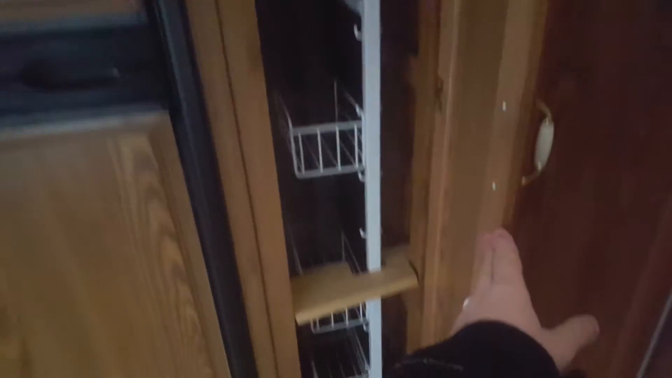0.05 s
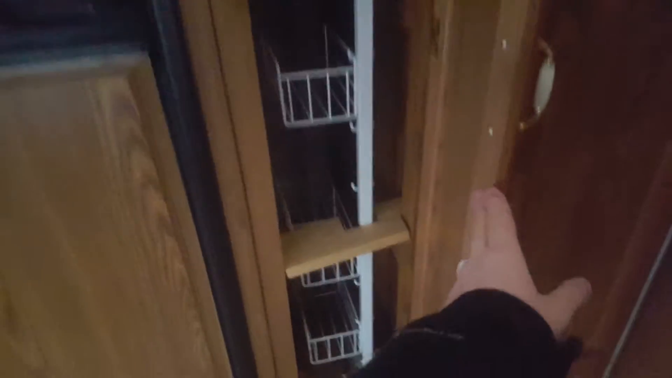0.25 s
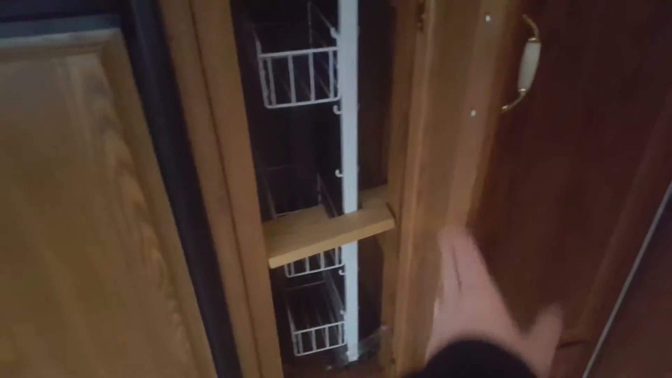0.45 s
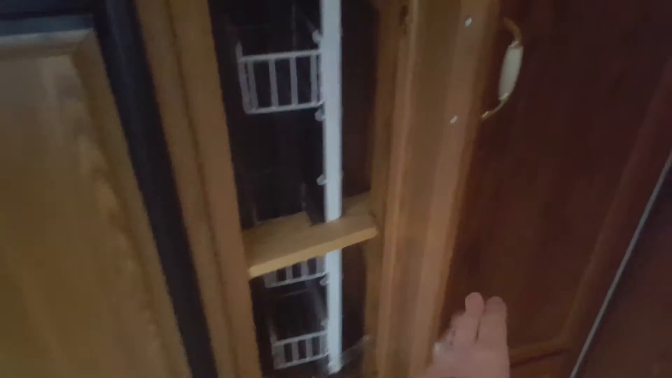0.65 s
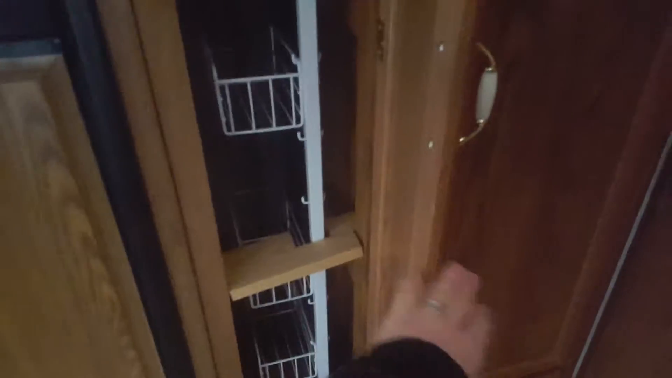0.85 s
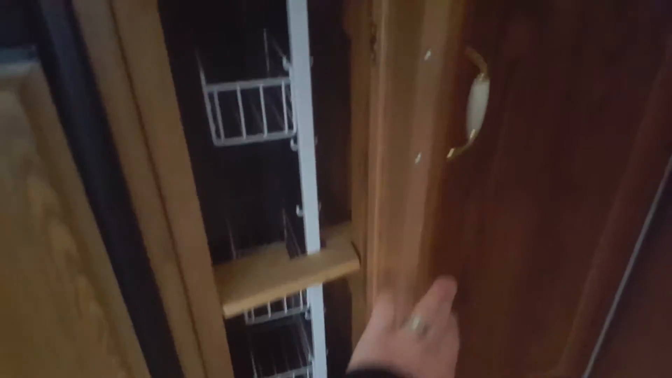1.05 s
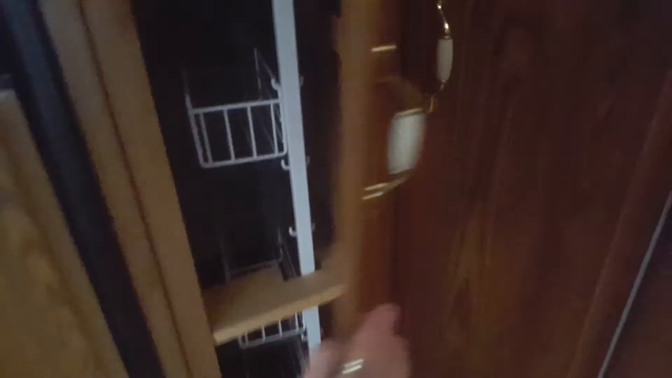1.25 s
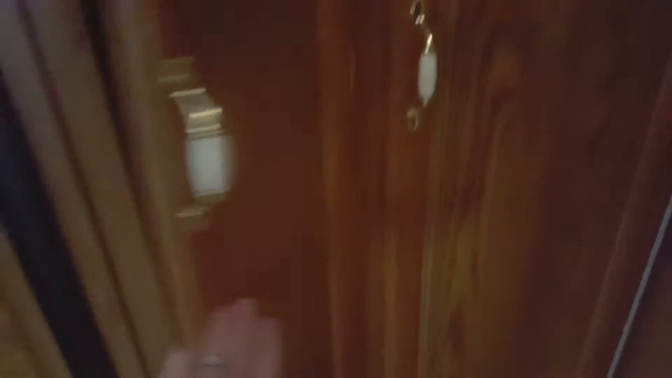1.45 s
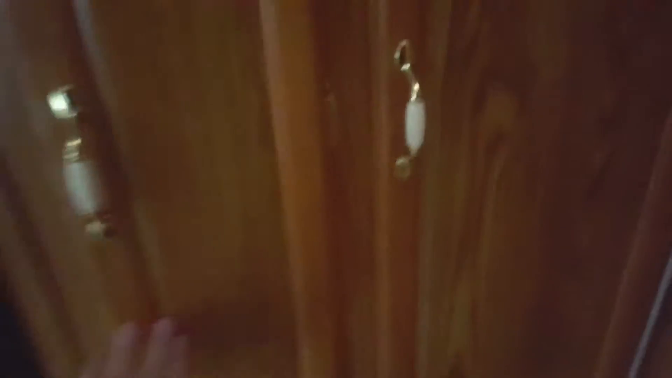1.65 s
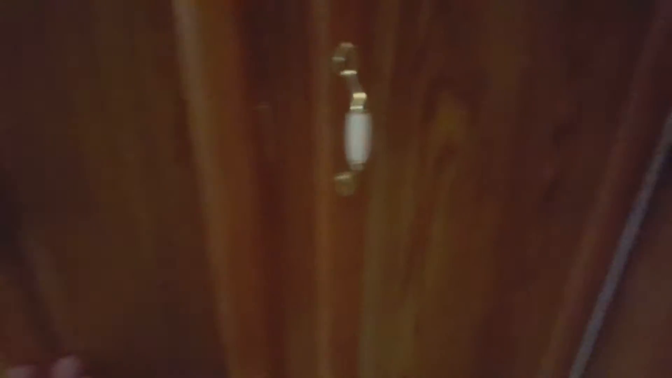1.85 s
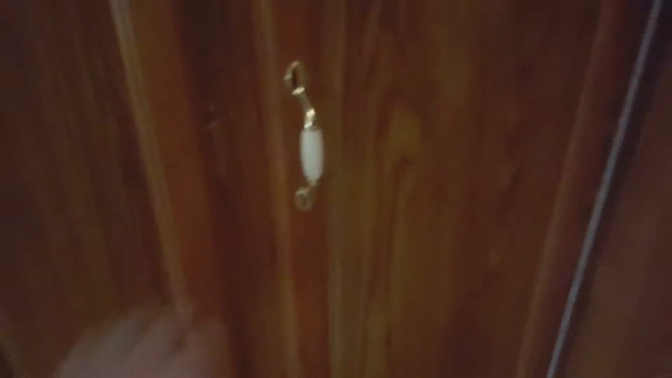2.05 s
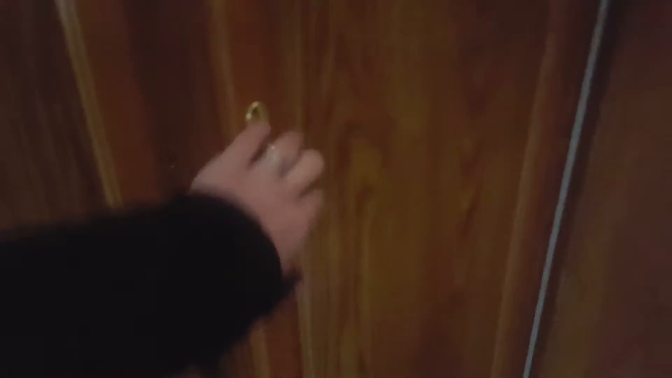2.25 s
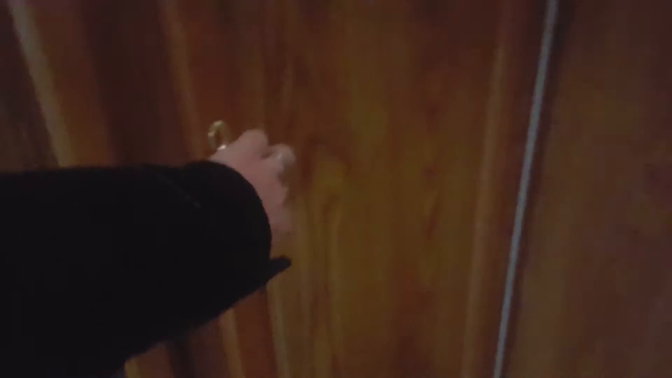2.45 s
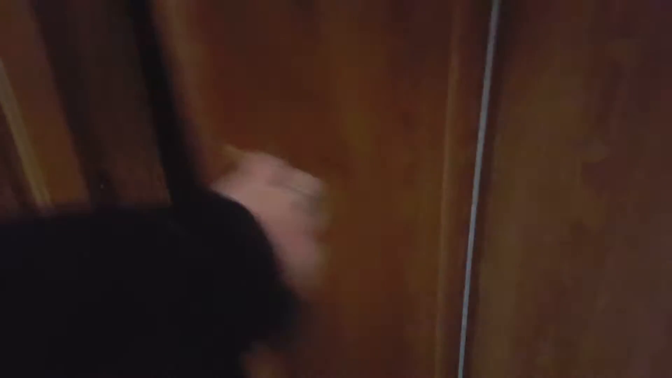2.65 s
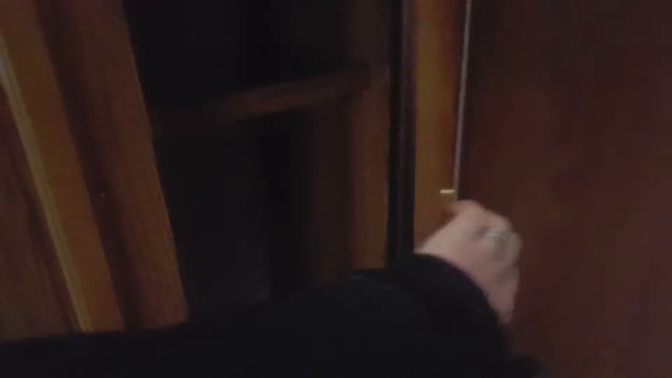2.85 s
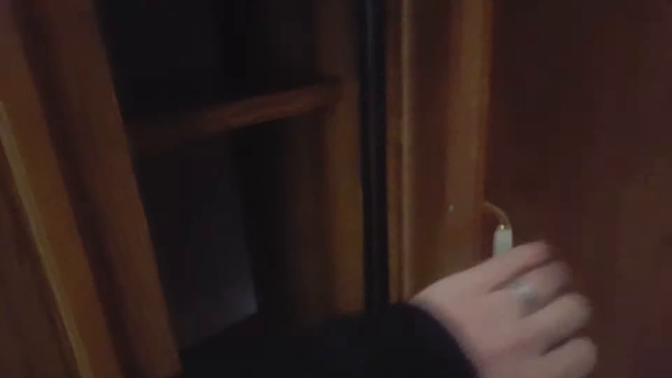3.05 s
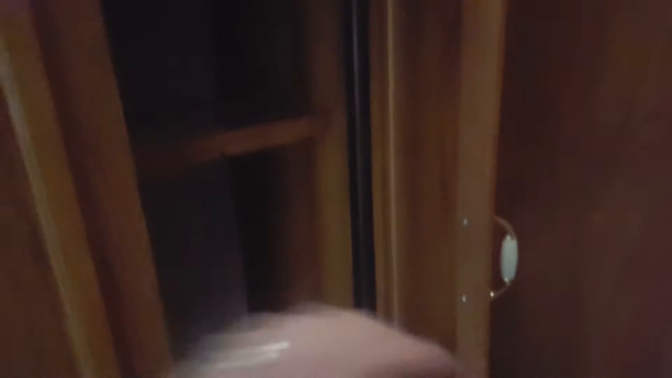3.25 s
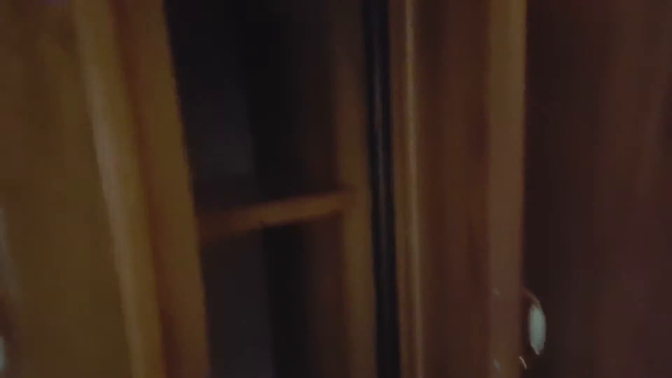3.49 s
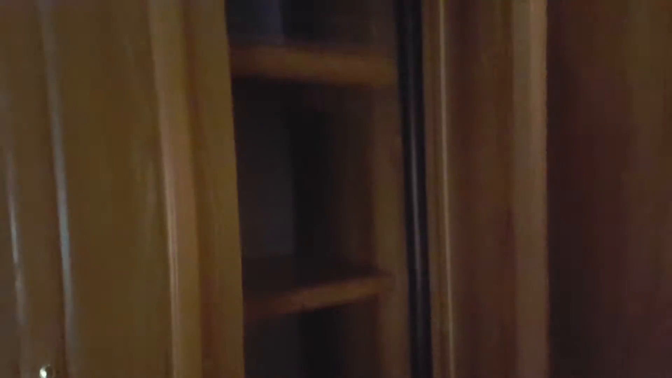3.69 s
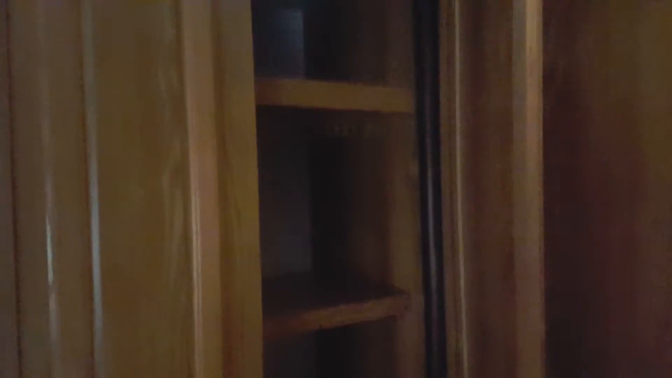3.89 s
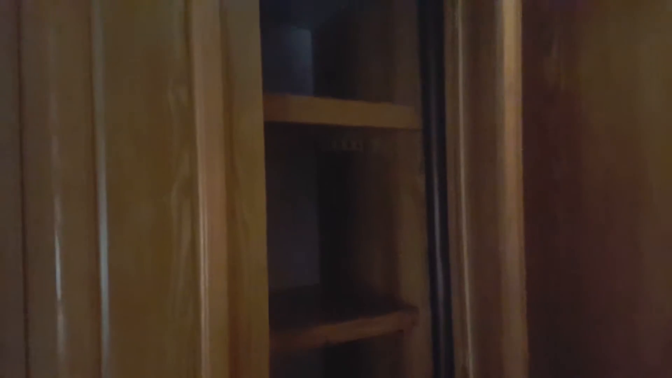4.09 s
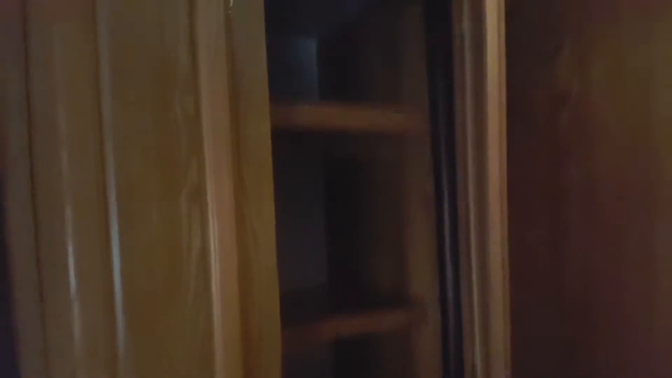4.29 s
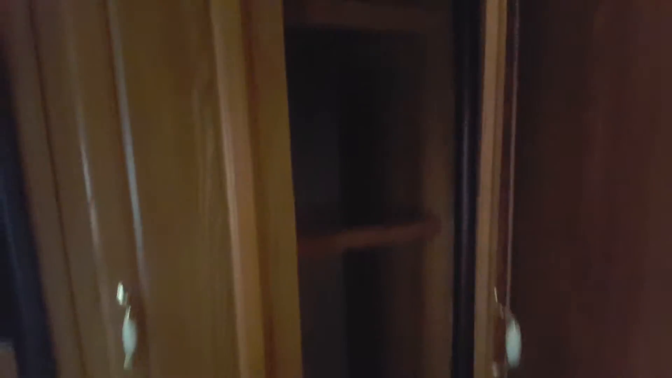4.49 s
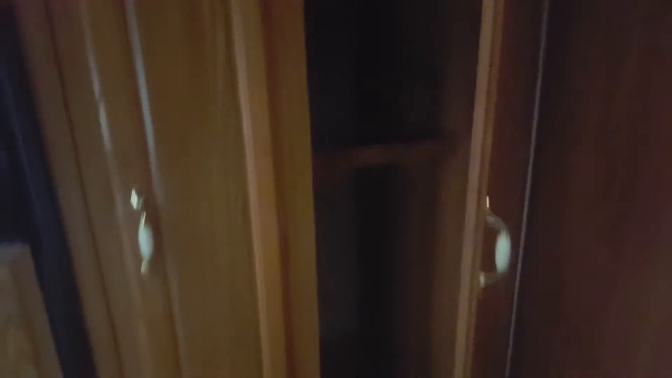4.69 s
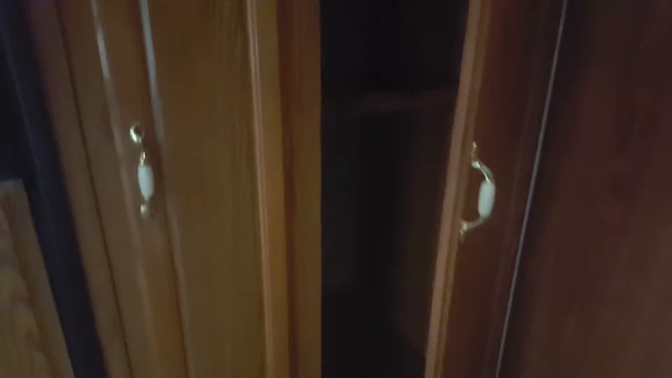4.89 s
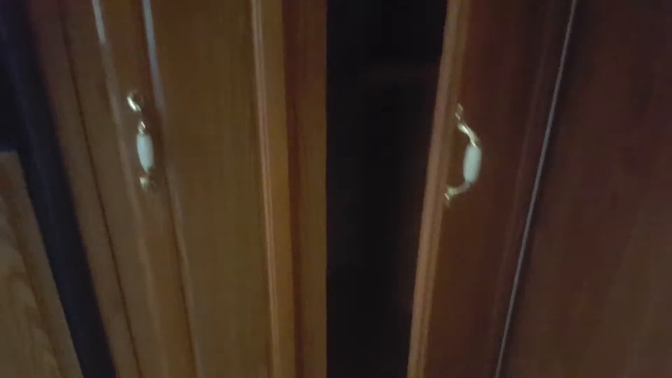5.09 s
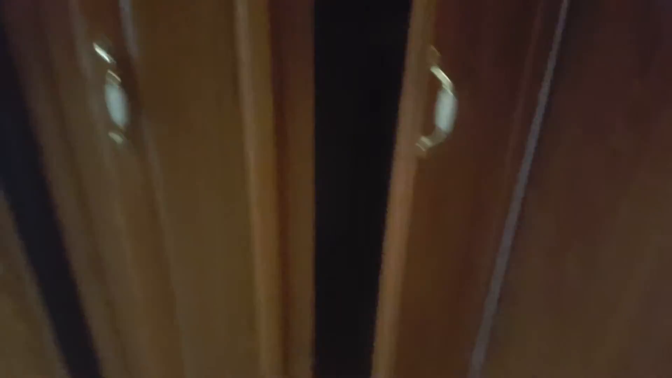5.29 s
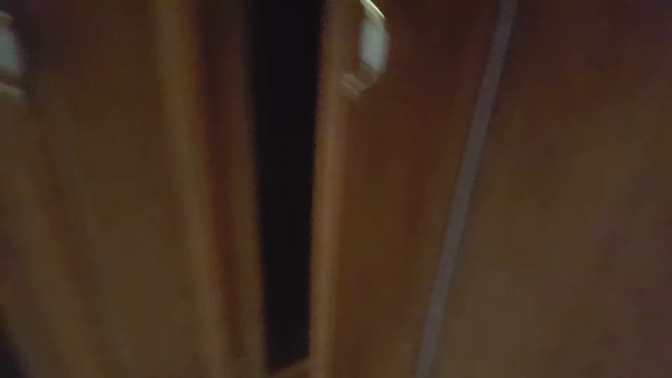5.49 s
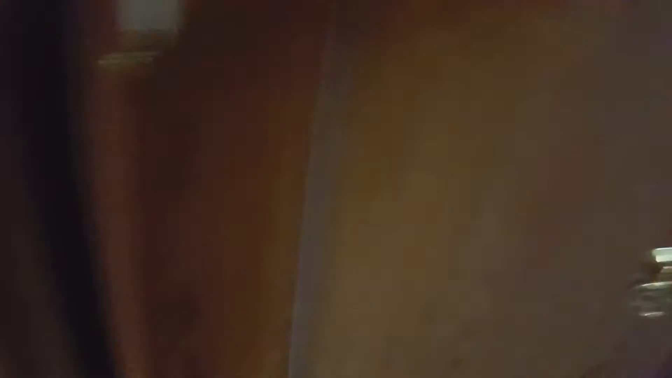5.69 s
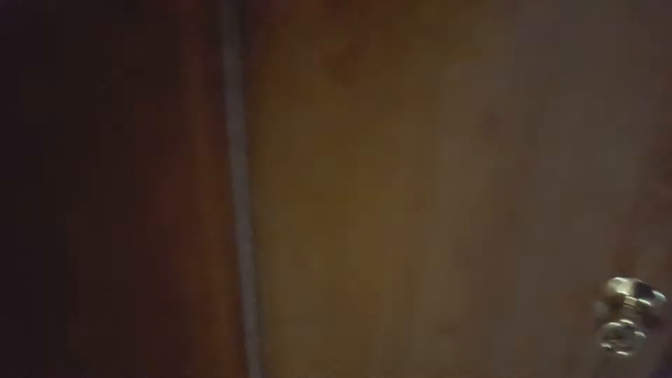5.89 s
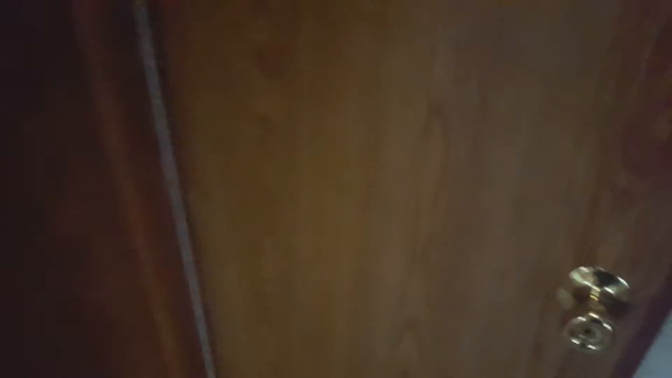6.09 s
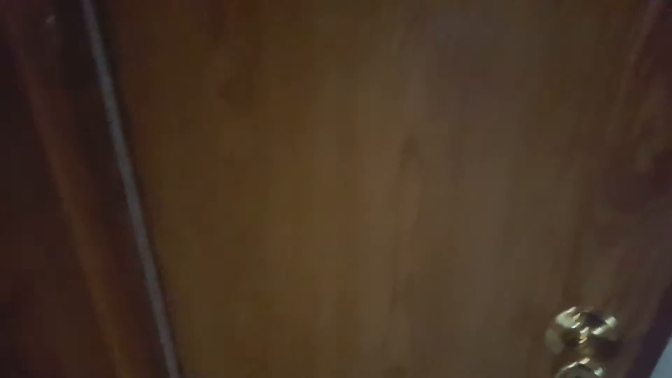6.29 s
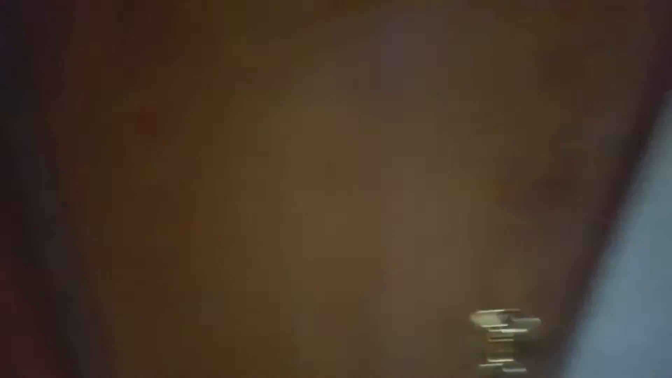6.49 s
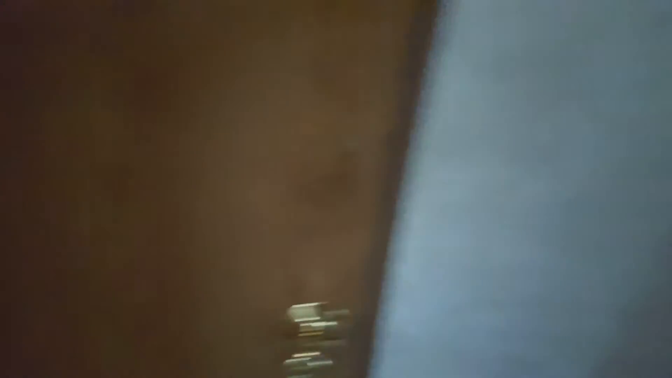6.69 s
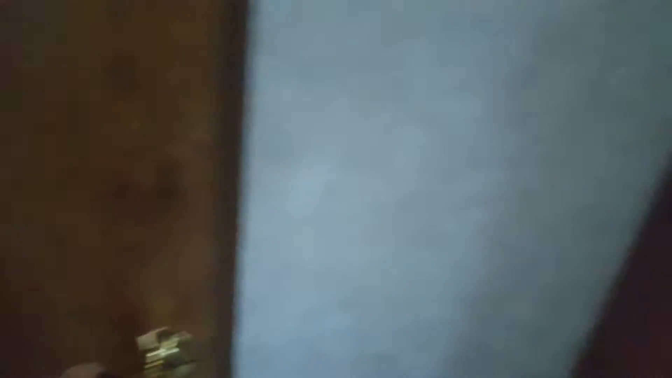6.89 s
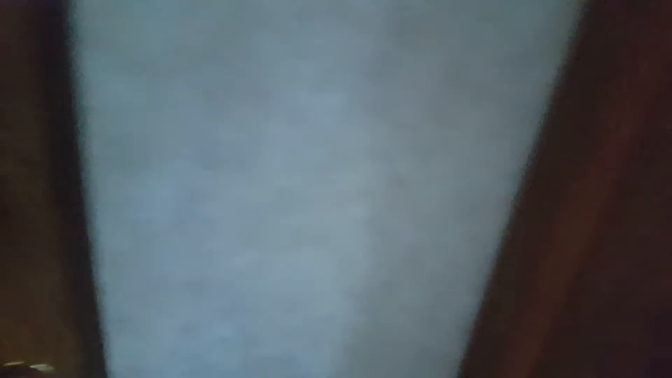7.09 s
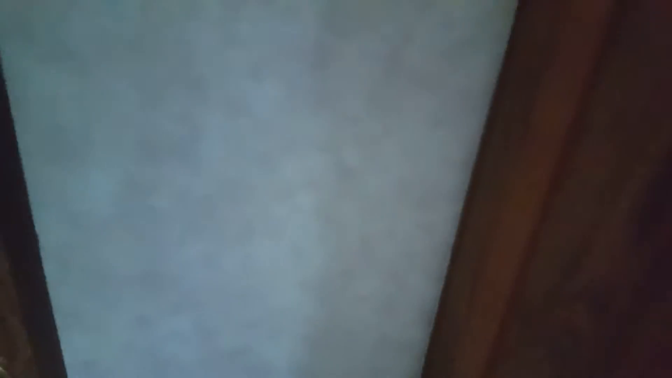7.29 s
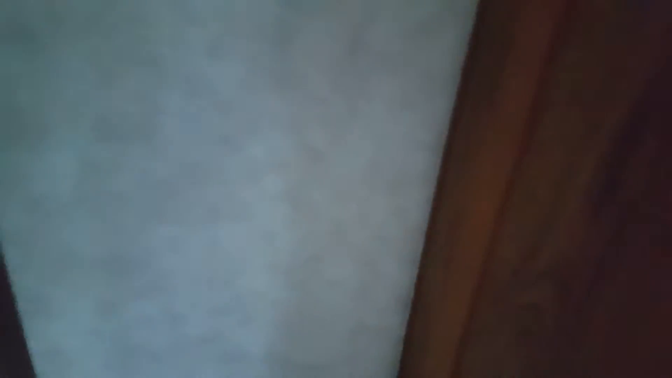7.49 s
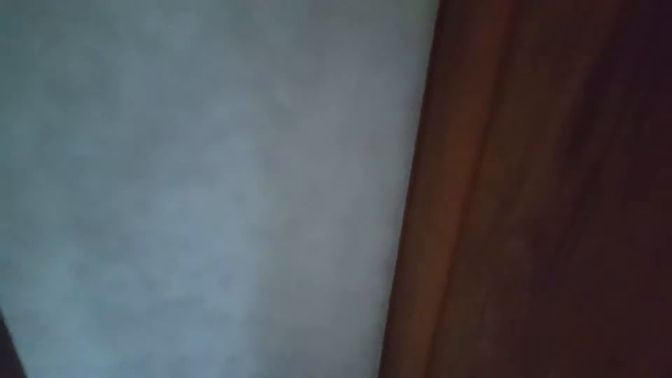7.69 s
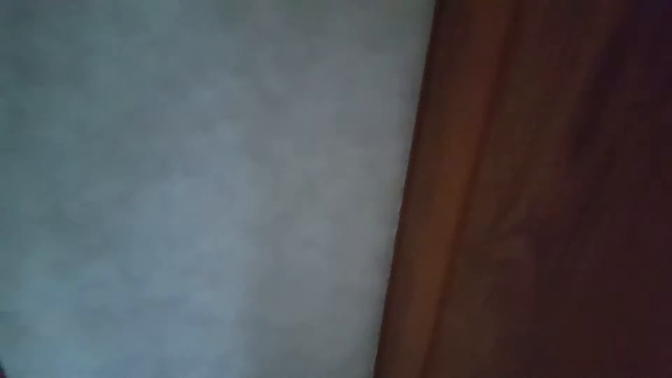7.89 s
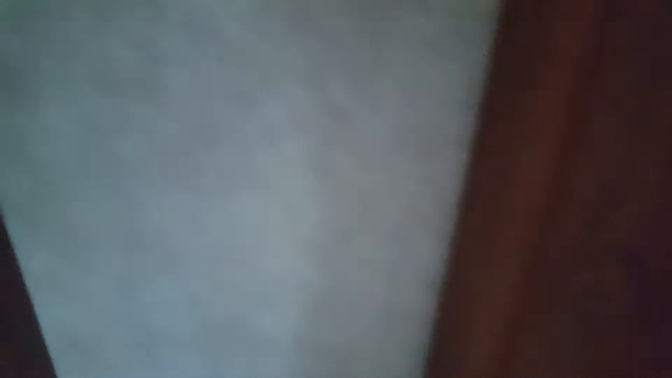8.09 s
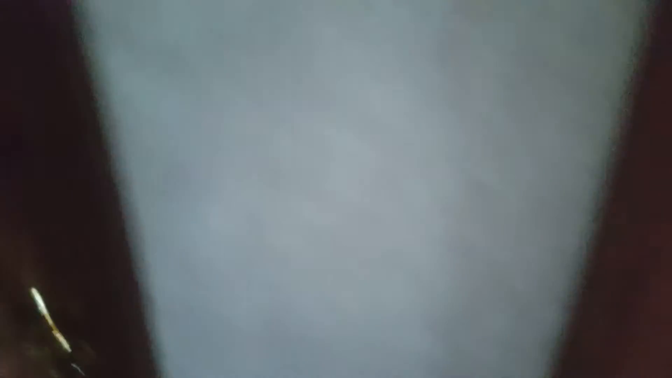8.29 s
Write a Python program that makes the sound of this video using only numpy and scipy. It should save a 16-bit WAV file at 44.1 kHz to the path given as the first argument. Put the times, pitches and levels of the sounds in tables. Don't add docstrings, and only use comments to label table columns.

```python
import sys
import numpy as np
from scipy import signal
from scipy.fft import rfft, irfft, next_fast_len
from scipy.io import wavfile

SR = 44100
rng = np.random.default_rng(int(sys.argv[2]) if len(sys.argv) > 2 else 0)


def undo_db(level):
    steps = np.asarray(level, float) / 20
    return 10 ** steps


def wav_record(signal):
    frames = np.transpose(np.atleast_2d(signal))
    bounded = np.clip(frames, -1, 1)
    quanta = np.round(bounded * 32767).astype(np.int16)
    wavfile.write(sys.argv[1], SR, quanta)


N = 368058

# f/Hz, density/dB per Hz
AIR = [(15, -60), (25, -6.5), (54, -20), (102, -7.5), (145, -11.5), (182, -20), (224, -16.5), (471, -23),
       (579, -23.5), (698, -25), (774, -24.5), (1030, -25), (1700, -21.5), (3500, -33.5), (4550, -39),
       (7700, -120)]
# f/Hz, density/dB per Hz
MICROPHONE = [(1650, -3.5), (2800, -3), (4180, -3), (4950, -1), (5200, -6.5), (6520, -5), (7230, -11.5),
              (9600, -25.5), (11900, -9), (13600, -22.5), (15100, -21), (16000, -93)]
# f/Hz, likeness/-1 to 1
LIKENESS = [(60, 0.91), (180, 0.96), (550, 0.45), (1650, -0.23), (4970, 0.088), (15000, -0.11)]
# f/Hz, density/dB per Hz
WOOD = [(250, -1), (700, -2), (1000, -2), (1400, -4.5), (2200, -9), (3200, -11.5), (6000, -28),
        (12000, -55)]
# t/s, rumble/dB
FOOTING = [(0.0, -51), (0.95, -48.5), (1.72, -44.5), (2.3, -43.5), (2.56, -44), (2.88, -48), (3.3, -47.5),
           (3.44, -50.5), (3.88, -55), (4.48, -45), (5.8, -52.5), (5.94, -52), (6.46, -40.5), (6.69, -49.5),
           (6.97, -52), (7.22, -44), (8.06, -48.5), (8.34, -44.5)]
# t/s, air level/dB, openness toward the shelves/0-1
FACING = [(0.0, 0.5, 0.32), (1.16, 1, 0.45), (1.9, 1.4, 0), (3.45, 2, 0), (3.86, 1.5, 1), (4.14, 1, 0.73),
          (4.6, 1.65, 0.98), (5.39, 0.5, 1), (5.63, 0.5, 0.2), (6.2, 0.5, 0.16), (6.5, -3, 0.27),
          (6.85, -1.5, 0), (7.3, 0.5, .05), (7.6, 3, 0.1), (7.85, -0.5, 0.5), (8.35, 3, 0)]
# f/Hz, nearest/s, level there/dB, loss/dB per s
PANEL_HUM = [
    (250, 0.5, -48, 13.5),
    (502, .6, -67, 9),
    (317, 0.13, -52, 30),
    (1690, 3.9, -57, 14),
    (560, 5.42, -55, 70),
    (524, 6.6, -62, 16),
    (140, 5.95, -41, 98),
    (194, 7.05, -56, 2.5),
    (195.6, 8.43, -43.5, 24),
]
# t/s, hold/s, boom/dB, wood/dB
PUSHES = [(0.0, 0.18, -61, -55), (.39, 0.2, -50.5, -63), (1.8, 0.3, -54, -52.5), (2.278, 0.13, -33, -44),
          (2.544, 0.042, -33.5, -35.5), (2.7, 0.07, -43, -73), (3.3, 0.146, -47, -73),
          (4.24, 0.077, -47, -64), (4.45, 0.056, -56, -51), (5.1, 0.31, -47, -64.5),
          (5.918, 0.041, -32, -45.5), (6.04, 0.033, -41.5, -63), (6.33, 0.043, -30, -42),
          (7.02, 0.034, -41.5, -48), (7.05, 0.026, -34.5, -56), (7.12, 0.012, -38, -37.5),
          (7.19, 0.02, -33.5, -66), (7.368, 0.0083, -41, -35.5), (7.535, 0.083, -36, -39),
          (7.865, 0.028, -42, -37.5), (7.96, 0.057, -52, -55), (8.07, 0.044, -46.5, -60),
          (8.232, 0.0071, -29.5, -52), (8.322, .01, -57, -35.5)]
# f/Hz, width/Hz, level/dB
HOLLOW_PANELS = [(54.4, 8.7, 3.5), (80, 6.3, 2), (114.8, 9.5, 5), (193, 77, 6.5), (268, 17, 8.5),
                 (333, 52, 11), (425, 190, -33), (506, 71, -2.5)]
# t/s, peak/dB, lowest f/Hz, touch/s, way and share/+ press, - release
CASE_TICKS = [
    (0.2316, -24, 120, 0.00063, 0.98),
    (0.7418, -20.5, 120, 0.00049, 0.84),
    (5.277, -8.5, 560, 0.00091, -1.06),
]
# t/s, crack peak/dB, wood/dB, rattle t60/s, left-right/dB
TICKS = [(1.4035, -35, -44, 0.05, 0), (1.5714, -24, -50, .021, -4), (2.5334, -17.5, -56, 0.037, 4),
         (2.5535, -19, -35, .03, 2), (2.6005, -18, -40, .02, 2), (7.1165, -27, -31, .03, 0),
         (3.867, -33, -50, 0.026, 11), (5.2974, -27.5, -40, 0.011, -17), (5.5492, -26, -46, 0.0077, 29),
         (5.57, -30, -55, 0.0096, 26), (5.592, -38, -60, .01, 15), (5.9192, -36, -31, 0.05, -1),
         (6.929, -28, -48, 0.02, 0), (7.1808, -23, -38.5, 0.076, 9), (7.181, -14, -28, 0.012, -7),
         (7.367, -31.5, -33, 0.048, -0.5), (7.5255, -35, -32, 0.012, -1), (7.562, -15.5, -24, 0.013, 4.5),
         (7.5655, -40, -31, 0.053, -3), (7.572, -36, -37, .02, 8), (7.6056, -12, -26, 0.015, 2),
         (7.607, -44, -31, 0.054, -5), (7.615, -32, -31.5, 0.011, 16), (8.3227, -27, -36.5, 0.09, 4)]
# t/s, crack peak/dB, wood/dB, rattle t60/s, left-right/dB
METAL_TICKS = [
    (1.6245, -14, -40, .02, 0),
    (2.5332, -24, -56, .02, 3),
    (2.6025, -20, -40, .015, 2),
    (6.2212, -18, -40, .03, 2),
    (7.0555, -33, -50, .012, 0),
    (7.0937, -32, -50, .02, 0),
    (7.1812, -22, -30, .015, 0),
]
# t/s, crack peak/dB, crack f/Hz, wood/dB, rattle t60/s
FIRST_SHUT = [
    (1.6245, -7.5, 4200, -11, 0.035),
    (1.6285, -5.5, 3120, -13, 0.037),
    (1.6364, -18, 2600, -41, 0.037),
    (1.6495, -7.5, 3900, -28, 0.03),
    (1.6565, -17, 2500, -9, 0.071),
    (1.686, -33, 2300, -30, 0.14),
]
PULLED_OPEN = [(2.374, -33.5, 3700, -39, 0.11), (2.553, -21.5, 3250, -29, 0.11),
               (2.584, -24, 3000, -28, 0.074), (2.576, -13.5, 5950, -29.5, 0.11),
               (2.591, -25, 3380, -22, 0.067), (2.601, -11.5, 3440, -13.5, 0.031),
               (2.627, -24, 3200, -28.5, 0.072), (2.616, -29, 4500, -30, .03), (2.626, -29, 5800, -45, .03),
               (2.545, -42, 2500, -34, .04), (2.6904, -27, 4500, -49, 0.032), (2.7, -30, 5100, -48, .04)]
SECOND_SHUT = [(5.932, -34, 3500, -38, .07), (5.96, -43, 3400, -51, 0.026),
               (6.2213, -11, 3420, -14.5, 0.058), (6.2248, -9, 4100, -19, 0.081),
               (6.2415, -15, 3000, -25, .04), (6.2552, -5, 4200, -8, 0.031), (6.257, -7, 2190, -11, 0.031),
               (6.267, -14, 2630, -30, 0.061), (6.279, -17, 3000, -36, 0.044),
               (6.2947, -25, 2670, -24, 0.044), (6.305, -26.5, 4400, -34, 0.33)]
PASSAGE = [(7.0557, -36.5, 5330, -37, 0.11), (7.0937, -25, 4200, -36, 0.082),
           (7.116, -29, 2900, -37, 0.087), (7.565, -30, 4100, -41, 0.088), (7.609, -28, 4100, -43, .1),
           (7.5, -38, 4120, -38, 0.099), (7.8332, -33.5, 3310, -37.5, 0.24), (7.864, -33, 4420, -37, 0.059),
           (7.877, -29, 2800, -35, 0.072), (7.9, -34, 4360, -50, 0.05), (7.93, -36, 5200, -52, .07),
           (7.97, -36, 6200, -45, 0.12), (8.028, -35, 2350, -41.5, 0.088), (8.054, -27, 5070, -49, 0.13),
           (8.1, -32.5, 4970, -44, 0.12), (8.23, -36, 4850, -46, 0.13), (8.273, -31, 3930, -55, 0.071)]
DOOR_PAN_DB = [0.5, 0.5, 2.4, 0.55, 3]
DOOR_TOP_DB = [-1, -0.5, -6, -7, -12]
DOOR_GAP_DB = [-13, -12, -16, -24, -26]
# t/s, peak/dB, softness/Hz
SLAMS = [
    [(1.629, -26, 1500), (1.658, -7.5, 403), (1.675, -16, 375)],
    [(6.23, -25, 500), (6.2585, -7, 270), (6.277, -18, 398)],
    [(7.062, -33, 300), (7.181, -23, 300), (7.23, -27.5, 150), (7.367, -38, 900)],
]
# f/Hz, level/dB, t60/s
CABINETS = [
    [(45.6, -11, 0.48), (63, -10, 0.64), (85, 9, 0.37), (113.7, -1.5, 0.44), (150, -3.5, 0.28),
     (179, -4.5, 0.31), (225, -3.5, 0.13), (261, -12, 0.2), (347, 5.5, 0.23), (398, 4, 0.1), (527, 4, 0.1),
     (724, -22, 0.12), (921, -22, .15)],
    [(45, -14, 0.98), (56, 3, 0.29), (78.7, 1, 0.58), (105.5, 2, 0.31), (120.4, 3, 0.36), (157.5, -4, 0.23),
     (190, -0.5, 0.29), (259, -1, 0.35), (290, -1, 0.2), (336, -7, 0.36), (408.5, -10, 0.85),
     (673, -6, 0.13), (970, -26, .15)],
    [(40.6, 2, 0.31), (64.5, 3.5, 0.4), (93, -7, 0.27), (122.5, -0.5, 0.23), (194.6, 4.5, 0.14),
     (366, 4, 0.16)],
]
# t/s, peak/dB, softness/Hz
LEAF_KNOCKS = [(2.578, -30, 2500), (2.594, -19.5, 2500), (2.603, -16, 6000), (2.625, -29, 5000),
               (7.564, -36, 3000), (7.571, -40, 3000), (7.608, -35, 3000), (7.617, -39, 3000),
               (7.835, -35, 3000), (7.845, -40, 3000), (7.857, -33.5, 3000), (7.873, -36, 2500)]
# f/Hz, level/dB, t60/s
LEAF = [(298, -21, .15), (398, -5, 0.18), (588, -5.5, 0.096), (835, -24, 0.061), (953, -6, .07),
        (1057, 1.5, 0.061), (1127, -7, .07), (1340, -6, 0.072), (1670, -14, .08), (3450, -12, 0.08)]
# t/s, peak/dB, softness/Hz
SPRING_KNOCKS = [
    [(2.588, -28, 9000), (2.602, -23, 9000), (2.612, -28, 9000), (2.626, -27, 9000), (2.637, -30, 9000)],
    [(7.117, -36, 8000), (7.123, -36.5, 8000), (7.129, -34, 8000)],
    [(7.866, -32.5, 1500), (7.876, -31, 1500), (7.887, -35, 1500)],
]
# f/Hz, level/dB, t60/s
SPRINGS = [
    [(3435, -4, 0.093), (3590, -2, 0.068)],
    [(2897, 4.5, .06), (1066, 6, .05), (4200, -2, .04)],
    [(398, 5, 0.14), (300, -3, 0.068), (458, -6, .08)],
]
# t/s, peak/dB, softness/Hz
PANEL_KNOCKS = [
    [(1.625, -27, 6000), (1.629, -25, 5000), (1.65, -30, 6000), (1.657, -21, 3000), (1.668, -27, 3000),
     (1.686, -31, 3000)],
    [(6.2225, -28, 6000), (6.227, -25, 6000), (6.243, -30, 6000), (6.2558, -20, 6000), (6.2575, -21, 5000),
     (6.267, -27, 5000), (6.279, -28, 4000), (6.295, -28, 4000)],
]
# f/Hz, level/dB, t60/s
DOOR_PANELS = [
    [(700, -0.5, .1), (923, -1, .09), (1287, -10, .12), (1420, -8, .12), (1515, -10, .12), (2260, -9, .12),
     (2380, -12, .12), (2869, -14, .12)],
    [(718, -4, .14), (830, -8, .12), (990, -5.5, .14), (1220, -11, .15), (1450, -7, .13), (1615, -5, .06),
     (1764, -5, .1), (1933, -9, .12), (2300, -9, .12), (2520, -6, .1), (2720, -7, .1), (2850, -10, .1)],
]
# t/s, hold/s, level/dB, top octave relative/dB
SLEEVE = [
    (2.142, 0.18, -57.5, -8),
    (2.335, 0.013, -52.5, -9),
    (3.604, 0.061, -49, -6.5),
    (3.71, 0.05, -47, -3),
    (5.56, 0.027, -45, -3.5),
    (8.057, 0.051, -52, -7),
]
# t/s, effort/dB, unevenness of the slips/dB
SQUEAK = [
    (5.311, -35, 5),
    (5.333, -37, 2),
    (5.337, -27, 3),
    (5.356, -25.5, 2),
    (5.381, -24, 0),
    (5.402, -26, 2),
    (5.413, -28, 7),
    (5.424, -35, 4),
    (5.445, -49, 4),
]
# t/s, rate/slips per s
SLIPS = [
    (5.311, 705),
    (5.333, 735),
    (5.348, 758),
    (5.356, 815),
    (5.368, 895),
    (5.382, 948),
    (5.402, 880),
    (5.414, 810),
    (5.445, 630),
]
# f/Hz, level/dB
HINGE_BODY = [(380, -22), (580, 2), (760, -4), (900, 2.5), (1150, -7), (1450, 1.5), (1850, 9.5), (2090, -2),
              (2270, 9), (2550, -7), (2850, 3.5), (3300, -9), (3700, -2.5), (4600, -4), (5400, -15),
              (8000, -29)]


def rms_one(x):
    return x / np.sqrt(np.mean(x ** 2) + 1e-20)


def in_time(rows, silent=-120):
    s, *columns = np.transpose(rows)
    return [np.interp(np.arange(N) / SR, s, c, silent, silent) for c in columns]


def at_hz(points, hz):
    point_hz, level = np.array(points).T
    return np.interp(np.log(hz), np.log(point_hz), level)


def drift(rate):
    r = np.exp(-80 * np.pi * rate / SR)
    slow = signal.lfilter([1], [1, -2 * r, r * r], rng.standard_normal(N // 40 + 2002))[2000:]
    return np.interp(np.arange(N) / 40, np.arange(len(slow)), rms_one(slow))


def stereo_noise(colour_db, length=N):
    size = next_fast_len(length, real=True)
    hz = np.fft.rfftfreq(size, 1 / SR) + 1
    alike = np.clip(at_hz(LIKENESS, hz), -.9, .99)
    mid, side = rfft(rng.standard_normal((2, size))) * undo_db(colour_db(hz))
    ports = np.sqrt(.5 + alike / 2) * mid + np.sqrt(.5 - alike / 2) * side * [[1], [-1]]
    return rms_one(irfft(ports, size)[:, :length])


def band(x, low_hz, high_hz):
    return signal.sosfilt(signal.butter(2, [low_hz, high_hz], "band", fs=SR, output="sos"), x)


def treble(cut_hz):
    return stereo_noise(lambda hz: at_hz(MICROPHONE, hz) - 20 * np.log10(1 + (cut_hz / hz) ** 3))


def swells(rows, rise_db_per_s, fall_db_per_s):
    t = np.arange(0, N + 32, 32) / SR
    s, hold, *levels = np.transpose(rows)[:, :, None]
    before, after = np.maximum(s - t, 0), np.maximum(t - s - np.abs(hold), 0)
    shape_db = -rise_db_per_s * before - fall_db_per_s * after
    return [np.interp(np.arange(N) / SR, t, undo_db(db + shape_db).sum(axis=0)) for db in levels]


def background():
    air, other = (stereo_noise(lambda hz: at_hz(AIR, hz)) for _ in range(2))
    rumble_db, = in_time(FOOTING, silent=None)
    air_db, openness = in_time(FACING, silent=None)
    air_db = air_db + .5 * drift(11.4)
    hum_db = -55.5 + 0.34 * (rumble_db - rumble_db.mean())
    hollow_db = -53.5 + air_db + 5 * openness
    out = undo_db(rumble_db + 1.5 + drift(36)) * rms_one(band(air, 34.3, 119.0))
    out += undo_db(hum_db + 1.2 * drift(26.0)) * rms_one(band(other, 209, 377))
    out += undo_db(-55 + air_db) * rms_one(band(air, 420, 1250))
    out += undo_db(hollow_db) * rms_one(band(other, 1250, 3000))
    for hz, nearest_s, db, loss_db in PANEL_HUM:
        away_s = np.abs(np.arange(N) / SR - nearest_s)
        out += undo_db(db - loss_db * away_s) * rms_one(band(air, hz / 1.05, hz * 1.05))
    return out + undo_db(-56.5 + air_db) * treble(cut_hz=2100)


def handling():
    pushes = stereo_noise(lambda hz: -20 * np.log10(1 + (hz / 600) ** 3 + (42 / hz) ** 2))
    pushes = pushes * undo_db(2.5 * drift(30))
    rung = []
    for hz, width_hz, level_db in HOLLOW_PANELS:
        r = np.exp(-np.pi * width_hz / SR)
        poles = [1, -2 * r * np.cos(2 * np.pi * hz / SR), r * r]
        rung.append(undo_db(level_db) * signal.lfilter([1 - r, 0, r - 1], poles, pushes))
    boom, wood = swells(PUSHES, rise_db_per_s=1400, fall_db_per_s=285)
    return boom * rms_one(sum(rung[:3])) + wood * rms_one(sum(rung[3:]))


def case_ticks():
    rebound_s, rebound_share = 0.00132, 0.64
    out = np.zeros(N)
    for s, peak_db, low_hz, touch_s, way in CASE_TICKS:
        age = np.arange(-400, 800) / SR - touch_s / 2
        pop = np.exp(-(4 * age / touch_s) ** 2)
        if way > 0:
            pop -= rebound_share * np.exp(-(1.8 * (age - rebound_s) / touch_s) ** 2)
        pop[400:405] += 0.06
        pop = signal.sosfiltfilt(signal.butter(4, low_hz, "high", fs=SR, output="sos"), pop)
        out[round(s * SR) - 400:][:1200] += way * undo_db(peak_db) * pop
    return out


def contacts(table, snap, rise_s, broad_db, cut_hz, port_db):
    port_hz = 11800
    out = np.zeros((2, N))
    grain = undo_db(3.16 * drift(340))
    bright = grain * treble(cut_hz)
    dull = grain * stereo_noise(lambda hz: at_hz(WOOD, hz))
    body, top = band(bright, 300, 8200), band(bright, 8200, 15500)
    gap = rms_one(band(bright, 7300, 10600))
    for s, crack_db, hz, wood_db, t60, pan_db, top_db, gap_db in table:
        now = slice(round(s * SR), round(s * SR) + SR // 5)
        age = np.arange(bright[:, now].shape[1]) / SR
        dying = undo_db(-60 * age / max(t60, .004)) * np.minimum(age / rise_s, 1)
        broad = body[:, now] + undo_db(top_db) * top[:, now] + undo_db(gap_db) * gap[:, now]
        pitched = rms_one(band(bright[:, now], hz / 1.21, hz * 1.12))
        crack = undo_db(broad_db) * broad + 0.29 * pitched
        fading = 1.4 * np.exp(-age / .0007) * np.minimum(age / .0003, 1) ** 2
        port_lag = np.array([[0], [1.7]]) * np.minimum(age * hz, 1)
        ping = snap * fading * np.sin(2 * np.pi * hz * age + port_lag)
        ping = ping + undo_db(port_db + top_db) * fading * np.sin(2 * np.pi * port_hz * age)
        side = undo_db(np.array([[pan_db], [-pan_db]]) / 2)
        click = undo_db(crack_db - 14) * (dying * crack + ping)
        out[:, now] += side * (click + undo_db(wood_db - 1.0) * dying * dull[:, now])
    return out


def small_ticks():
    hz, gap_db = 5000, -17
    table = []
    for rows, top_db in ((TICKS, -2.5), (METAL_TICKS, 5)):
        table += [(s, db, hz, *rest, top_db, gap_db) for s, db, *rest in rows]
    return contacts(table, snap=2.7, rise_s=0.00071, broad_db=3.5, cut_hz=3800, port_db=-2)


def room(x):
    t60_s, level_db = 0.25, -7
    age = np.arange(SR // 2) / SR
    tail = stereo_noise(lambda hz: -10 * np.log10(1 + (hz / 4500) ** 2), len(age))
    tail = tail * undo_db(-60 * age / t60_s) * np.minimum(age / 0.0074, 1)
    tail *= undo_db(level_db) / np.sqrt(np.sum(tail ** 2) / 2)
    return signal.fftconvolve(x.mean(axis=0)[None], tail, axes=1)[:, :N]


def door_contacts():
    bolt = [(s, -27 + rng.normal(0, 1.5), 3300 * rng.uniform(0.77, 1.3), -35.5, 0.033)
            for s in 7.136 + .005 * np.arange(5)]
    doors = (FIRST_SHUT, PULLED_OPEN, SECOND_SHUT, PASSAGE, bolt)
    table = []
    for rows, *colour in zip(doors, DOOR_PAN_DB, DOOR_TOP_DB, DOOR_GAP_DB):
        table += [(*row, *colour) for row in rows]
    return contacts(table, snap=5.0, rise_s=0.0023, broad_db=4.0, cut_hz=2050, port_db=-6)


def ringing(blows, modes):
    push = np.full(N, 1e-18)
    for s, peak_db, soft_hz in blows:
        touch = np.hanning(round(SR / soft_hz) + 3)
        push[round(s * SR):][:len(touch)] -= undo_db(peak_db) * touch / touch.sum()
    out = np.zeros(N)
    for hz, level_db, t60 in modes:
        r, w = undo_db(-60 / (t60 * SR)), 2 * np.pi * hz / SR
        out += signal.lfilter([0, undo_db(level_db - 5.5) * np.sin(w)], [1, -2 * r * np.cos(w), r * r], push)
    return out


def slams():
    blows = SLAMS + [LEAF_KNOCKS] + SPRING_KNOCKS + PANEL_KNOCKS
    bodies = CABINETS + [LEAF] + SPRINGS + DOOR_PANELS
    boom = sum(ringing(b, modes) for b, modes in zip(blows, bodies))
    return boom + undo_db(-16) * band(band(boom, 110, 1500), 110, 1500) * [[1], [-1]]


def sleeve():
    peak_hz = 5050
    strokes = [(s, hold, db, db + top_db) for s, hold, db, top_db in SLEEVE]
    level, top = swells(strokes, rise_db_per_s=700, fall_db_per_s=900)
    rub = treble(cut_hz=6800)
    low = rms_one(band(rub, 2800, 8600)) + 0.49 * rms_one(band(rub, peak_hz / 1.17, peak_hz * 1.07))
    edge = band(band(rub, 8000, 10600), 8000, 10600)
    high = rms_one(band(rub, 8000, 16000)) + .45 * rms_one(edge)
    return undo_db(2.0 * drift(130)) * undo_db([[2.5], [-2.5]]) * (level * low + top * high)


def hinge():
    (rate,), (tone_db, uneven_db) = in_time(SLIPS), in_time(SQUEAK)
    grit_db = np.where(rate > 0, -38.5 + 0.82 * (tone_db + 30), tone_db)
    rate = np.maximum(rate, 100)
    jitter = .011 + .00015 * np.clip(880 - rate, 0, 200)
    wobble = drift(200)
    phase = 2 * np.pi * np.cumsum(rate * (1 + jitter * wobble)) / SR
    slowness = (rate.max() - rate) / 100
    tone = 0
    for k in range(1, 9):
        level_db = at_hz(HINGE_BODY, k * rate) - 5 * max(k - 4, 0) * slowness + 2.5 * drift(75)
        tone = tone + undo_db(level_db) * np.sin(k * phase + 7 * rng.random())
    stutter = np.clip(np.roll(wobble, SR), -2, 1.3) - 0.7
    tone = tone * undo_db(np.clip(uneven_db, 0, 12) * stutter) * undo_db([[2.0], [-2.0]])
    tone[1] = -np.roll(tone[1], 6)
    rasp = stereo_noise(lambda hz: at_hz(HINGE_BODY, hz) + 3.4 * np.log2(np.minimum(hz, 2600) / 2600))
    keep = undo_db(-60 / (0.22 * SR))
    lingering = signal.lfilter([1 - keep], [1, -keep], undo_db(tone_db - 2))
    grit = undo_db(grit_db) * band(treble(cut_hz=520), 1000, 11000)
    return undo_db(tone_db - 5.5) * tone + lingering * undo_db(-4) * rasp + grit


def scene():
    doors, ticks, squeak = door_contacts(), small_ticks(), hinge()
    wet = room(doors + 0.76 * ticks + .3 * squeak)
    close = handling() + sleeve() + case_ticks()
    return doors + ticks + squeak + wet + slams() + close + background()


def band_limit(x):
    return signal.sosfilt(signal.butter(12, 16460, fs=SR, output="sos"), x)


def record(dry):
    low_cut = signal.sosfilt(signal.butter(2, 38, "high", fs=SR, output="sos"), dry)
    rounded = 1.05 * np.tanh(low_cut / 1.05)
    top_cut = signal.cheby2(10, 50, 16400, fs=SR, output="sos")
    return band_limit(signal.sosfilt(top_cut, rounded))


dry = scene()
out = record(dry)
wav_record(out)
```